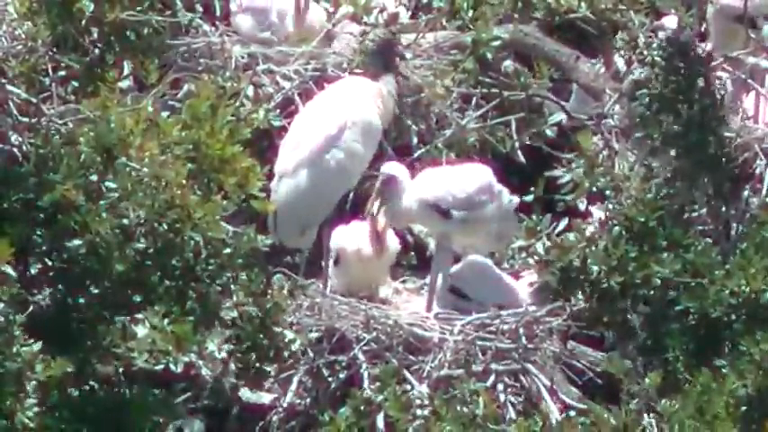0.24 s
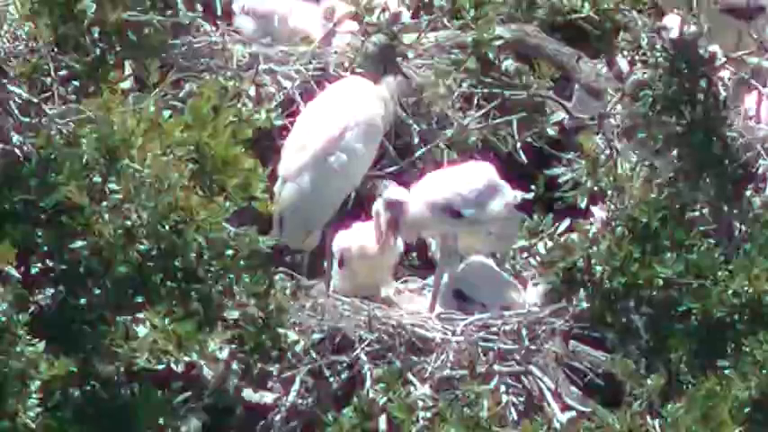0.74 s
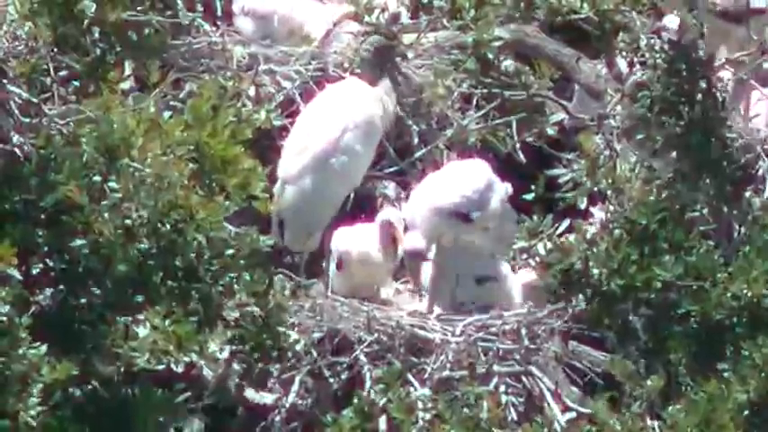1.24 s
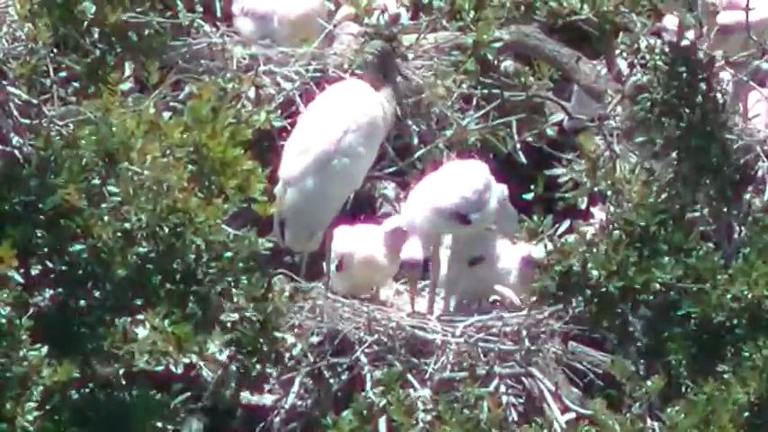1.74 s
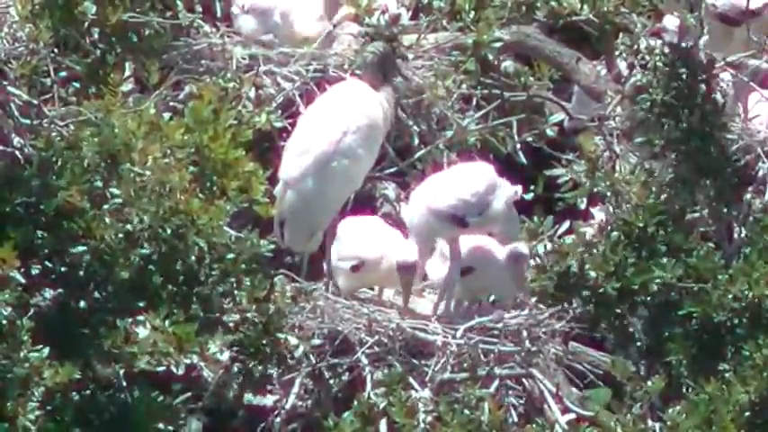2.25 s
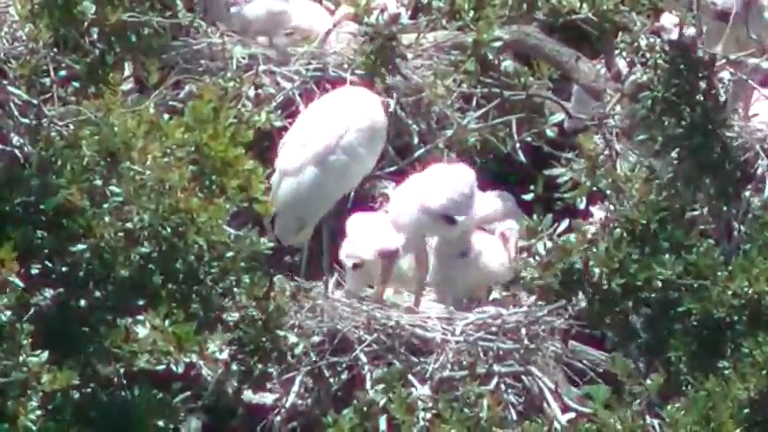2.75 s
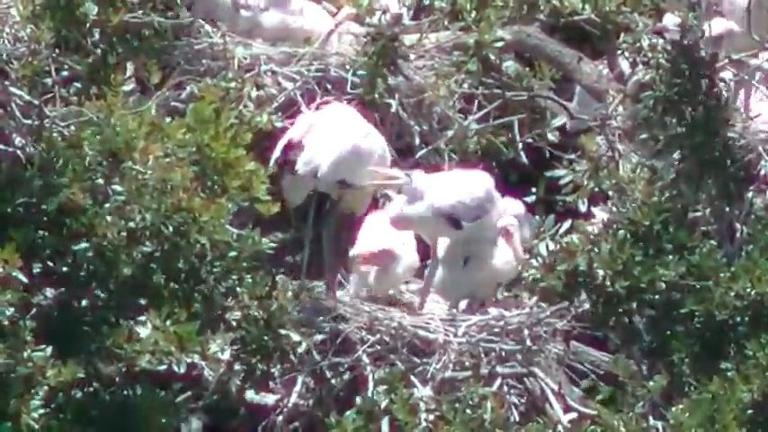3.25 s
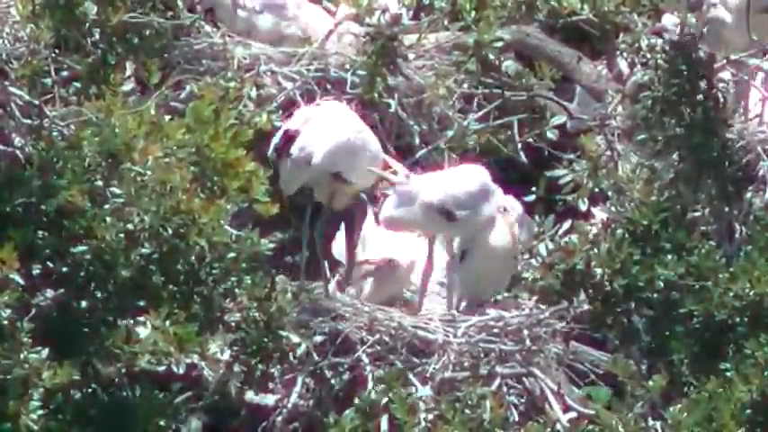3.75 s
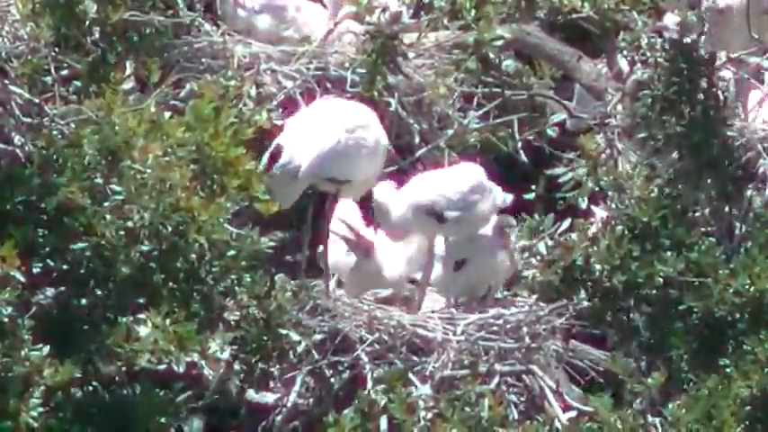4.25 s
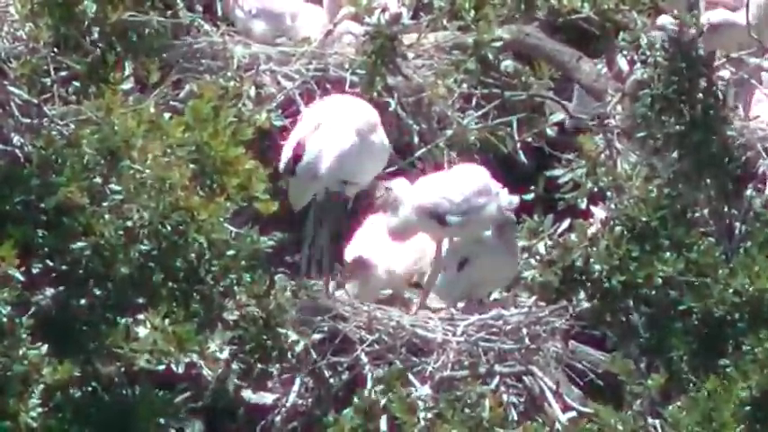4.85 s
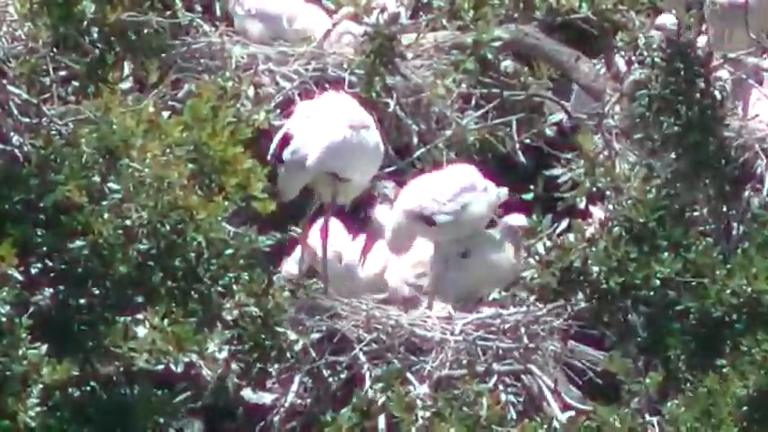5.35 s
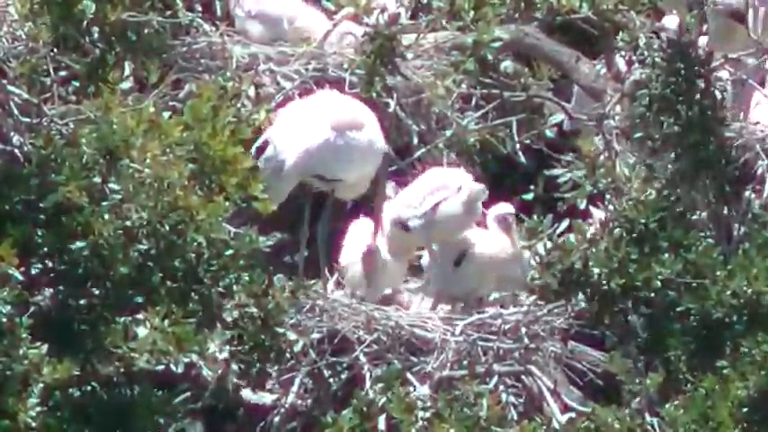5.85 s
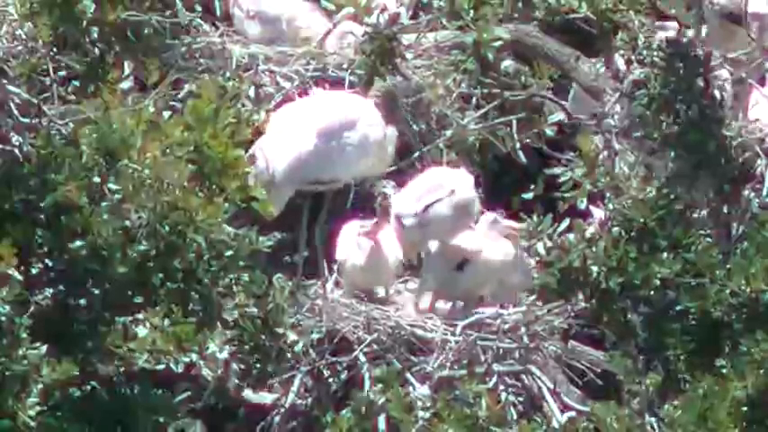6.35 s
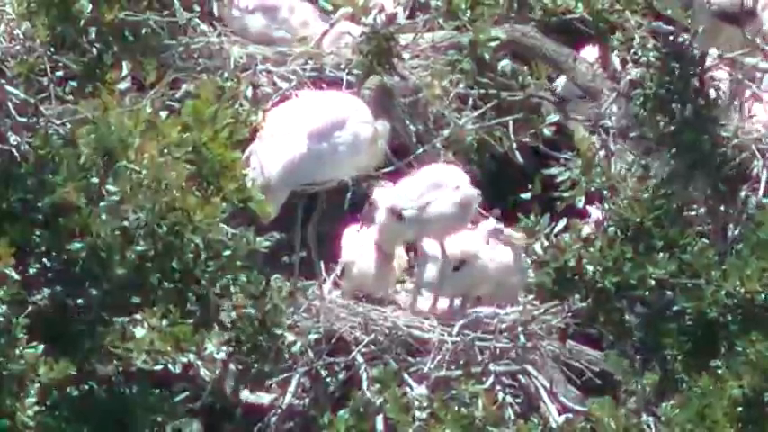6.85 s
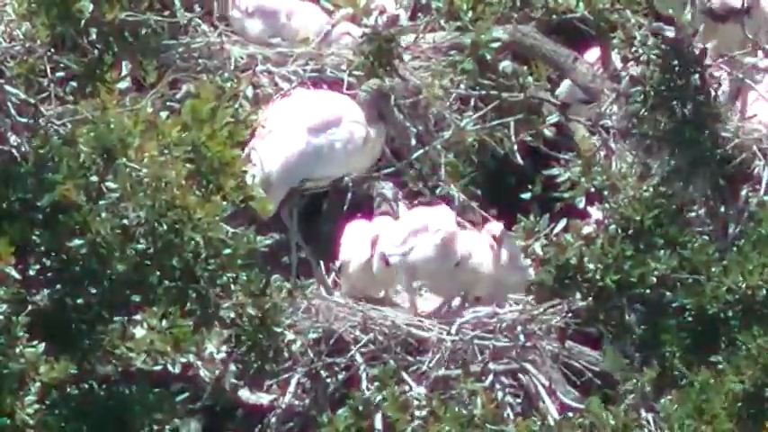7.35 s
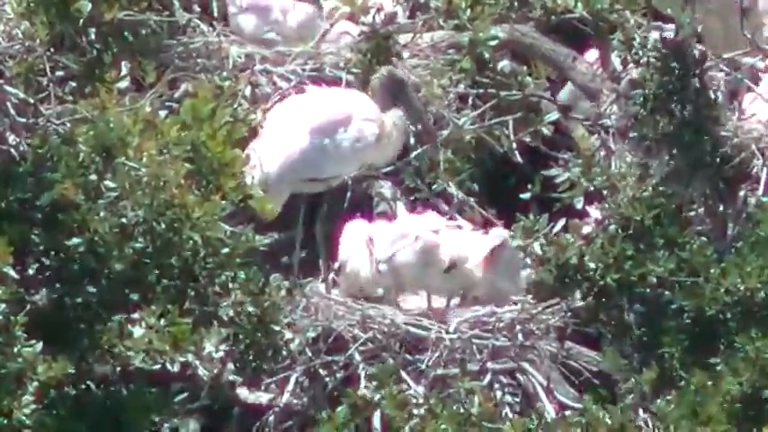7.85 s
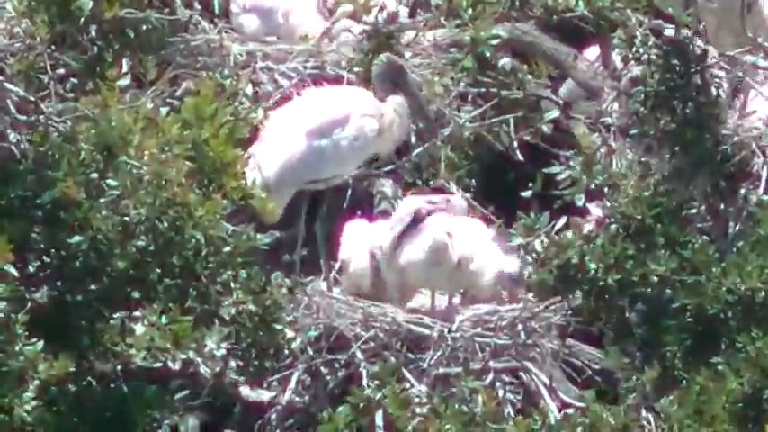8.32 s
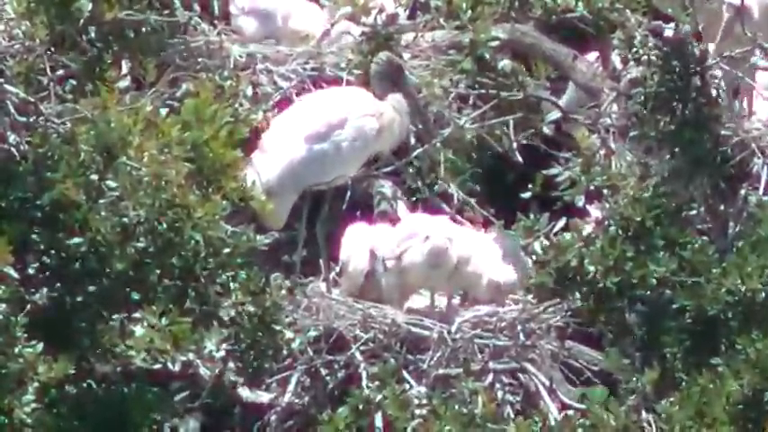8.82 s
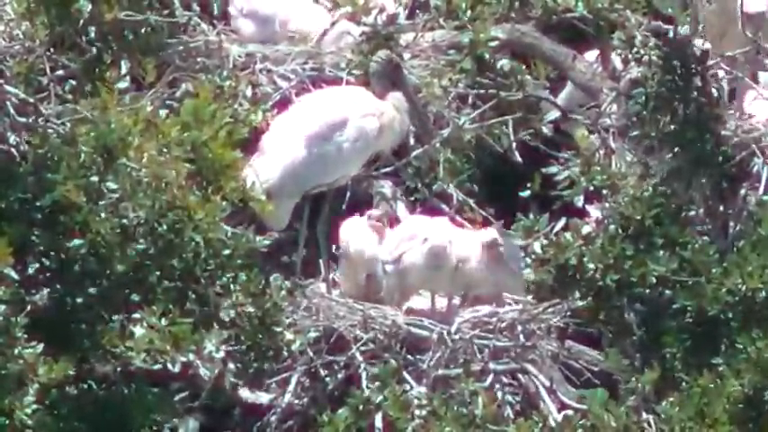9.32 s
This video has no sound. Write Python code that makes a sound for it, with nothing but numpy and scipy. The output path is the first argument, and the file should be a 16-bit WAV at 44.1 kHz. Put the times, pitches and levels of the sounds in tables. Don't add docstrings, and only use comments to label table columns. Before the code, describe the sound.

Outdoors at a wading-bird nesting colony, dry twigs scrape, rustle and snap very close to the microphone, with dull handling thumps and faint far bird chatter. After a brief dead silence the scene changes: a high cicada buzz drones steadily while a small songbird repeats a rising whistle and trill, and chicks squawk far off.

```python
import sys
import numpy as np
from scipy import signal
from scipy.fft import rfft, irfft, next_fast_len
from scipy.io import wavfile
from scipy.ndimage import uniform_filter1d

SR = 44100
rng = np.random.default_rng(int(sys.argv[2]) if len(sys.argv) > 2 else 0)


def generate_wav(sig):
    pcm = np.round(np.clip(np.atleast_2d(sig).T, -1, 1) * 32767).astype(np.int16)
    wavfile.write(sys.argv[1], SR, pcm)


def gain_from_db(level_db):
    decades = np.asarray(level_db, float) / 20
    return 10 ** decades


N = 422468

# start_s, end_s
CUT_S = (3.342, 3.3955)
# trill_start_s, whistle_lead_s, whistle_level_db, trill_length_s
SONG_PHRASES = [(3.421, 0.067, -49, 0.082), (3.662, 0.063, -50, .085), (3.909, 0.063, -51, 0.082),
                (4.147, .057, -50.5, 0.088), (4.404, .062, -53, .1), (4.66, .057, -56, 0.1),
                (4.935, .05, -59, 0.089), (5.21, 0.061, -54, 0.097), (5.485, 0.064, -51.5, 0.081)]


def evened(x):
    return x / np.sqrt(np.mean(abs(x) ** 2) + 1e-20)


def read(points, hz):
    f, value = np.transpose(points)
    return np.interp(np.log(hz + 1), np.log(f + 1), value)


def column(rows, index):
    rows = np.array(rows)
    return np.interp(np.arange(N) / SR, rows[:, 0], rows[:, index])


def add(mix, start_s, sound, left_right_db):
    part = mix[:, round(start_s * SR):][:, :sound.shape[-1]]
    gain = gain_from_db(np.array([[.5], [-.5]]) * left_right_db)
    part += sound[..., :part.shape[1]] * gain


def resonate(x, hz, width_hz):
    turn = np.exp(2j * np.pi * hz * np.arange(x.shape[-1]) / SR)
    r = np.exp(-np.pi * width_hz / SR)
    smooth = signal.lfilter([(1 - r) ** 2], [1, -2 * r, r * r], x / turn)
    return 2 * (turn * smooth).real


def highpass(x, order, hz):
    return signal.sosfilt(signal.butter(order, hz, "high", fs=SR, output="sos"), x)


def hiss(colour, patchy_db, flicker_db, likeness, size=512, count=N):
    # frequency_hz, coherence (0 to 1)
    coherence = [(100, 0.064), (600, 0.15), (900, 1), (2000, 0.42), (4500, 0.63), (7000, 0.051),
                 (10500, 0.057), (11400, 1)]
    frames, hz = 4 * count // size + 8, np.fft.rfftfreq(size, 1 / SR)
    a, b, c, d, patch = rng.standard_normal((frames, len(hz), 5), dtype=np.float32).T
    patch = uniform_filter1d(patch, size=6, axis=0)
    patch = evened(uniform_filter1d(patch, size=14, axis=1))
    flicker = evened(uniform_filter1d(rng.standard_normal(frames), size=3))
    like = np.clip(likeness * read(coherence, hz), 0, 1)[:, None]
    left = a + 1j * b
    right = like * left + np.sqrt(1 - like ** 2) * (c + 1j * d)
    z = np.array([left, right])
    z *= gain_from_db(read(colour, hz)[:, None] + patchy_db * patch + flicker_db * flicker)
    return evened(signal.istft(z, nperseg=size, noverlap=size * 3 // 4)[1][:, :count])


def background():
    # time_s, level_db
    din_level = [
        [(0.0, -57.5), (1.14, -62.5), (1.45, -62.5), (1.75, -54), (2.13, -61.5), (2.55, -63.5), (3.34, -63)],
        [(3.4, -52.5), (3.95, -55), (4.91, -57), (5.39, -53), (5.6, -55.5), (6.5, -55), (7.32, -52.5),
         (7.89, -54), (8.62, -56.5), (9.08, -54), (9.58, -55)],
    ]
    # frequency_hz, density_db
    din_colour = [(150, -55), (400, -32), (1300, -26), (1800, -5), (4000, -6.5), (5500, -9), (7500, -26.5),
                  (16000, -22)]
    # frequency_hz, density_db
    air_colour = [(60, -14.5), (150, -13.5), (300, -6.5), (1200, -10.5), (4000, -9), (12000, -8),
                  (14000, -3), (16000, -21.5)]
    # level_db, level_db
    air_db = (-66, -64.5)
    first = np.arange(N) < CUT_S[1] * SR
    din = gain_from_db(column(din_level[0] + din_level[1], index=1) - 1.0) * hiss(din_colour, 2.44, 1.0, 1)
    air = hiss(air_colour, 0.65, 0.27, 0.99, size=1024)
    top = signal.sosfiltfilt(signal.butter(4, 11000, "high", fs=SR, output="sos"), air)
    return din + gain_from_db(np.where(first, *air_db)) * (air - 0.5 * first * top)


def squawks():
    # start_s, length_s, throat_hz, width_hz, level_db
    squawk_rows = [(2.622, 0.025, 3240, 650, -63), (4.27, 0.028, 2900, 860, -51),
                   (4.635, 0.04, 2900, 1300, -52), (4.98, 0.056, 1850, 450, -59),
                   (5.335, 0.057, 2070, 450, -55.5), (5.725, 0.092, 3360, 1500, -54.5),
                   (5.86, 0.08, 3300, 700, -57), (6.185, 0.06, 3200, 800, -58),
                   (5.965, .05, 3200, 800, -58), (2.7, .07, 4300, 700, -59), (6.083, 0.04, 3150, 400, -56),
                   (6.123, 0.081, 2340, 900, -59), (6.928, 0.094, 3380, 340, -54),
                   (8.213, 0.059, 2200, 800, -62.5), (8.05, 0.14, 4550, 1400, -53),
                   (4.5, 0.056, 5100, 1400, -57), (9.12, 0.04, 2000, 890, -60),
                   (9.485, 0.1, 2130, 580, -53.5), (2.31, 0.11, 4500, 400, -56),
                   (8.74, .04, 2100, 700, -62), (0.69, .04, 2900, 500, -58), (2.175, 0.034, 1950, 630, -53)]
    out = np.zeros((2, N))
    for start_s, length_s, throat_hz, width_hz, level_db in squawk_rows:
        t = np.arange(round(length_s * SR)) / SR
        pulses = .5 + np.exp(-(t * 110 % 1) / 0.36)
        rasp = resonate(pulses * rng.standard_normal(len(t)), throat_hz, width_hz)
        rasp = evened(highpass(rasp, 6, 1600))
        add(out, start_s, gain_from_db(level_db) * rasp * signal.windows.tukey(len(t), .4), rng.normal(0, 1))
    return out


def tone(hz, level_db, rough):
    flutter = 1 + rough * evened(uniform_filter1d(rng.standard_normal(len(hz)), size=90))
    phase = 2 * np.pi * np.cumsum(hz) / SR
    note = gain_from_db(level_db) * flutter * np.sin(phase) * signal.windows.tukey(len(hz), .3)
    bushes = rng.standard_normal((2, 3000)) * gain_from_db(-60 * np.arange(3000) / SR / .11)
    bushes[:, :60] = 0
    echo = signal.fftconvolve(note[None], bushes / np.linalg.norm(bushes[0]), axes=1)
    return np.pad(note, (0, 2999)) + gain_from_db(-11.0) * echo


def whistle_notes():
    # start_s, length_s, pitch_hz, level_db
    peeps = [(0.756, 0.064, 2293, -59.5), (0.762, 0.051, 4020, -64), (1.119, .038, 2080, -69),
             (1.263, 0.032, 2100, -67), (2.0, 0.06, 810, -67.5), (2.332, 0.022, 2940, -54.5),
             (2.4, 0.1, 1830, -62.5), (2.43, 0.088, 3878, -60), (2.53, .025, 4990, -63),
             (2.73, .02, 4240, -63), (2.765, 0.042, 1844, -69), (3.11, 0.07, 1856, -69),
             (3.205, .035, 1870, -70), (3.254, .085, 1880, -68.5), (3.21, .12, 3130, -75),
             (5.395, 0.028, 3220, -52.5), (6.66, .03, 3700, -58), (6.84, .02, 3700, -56),
             (7.401, 0.052, 3740, -55), (7.215, .04, 3400, -59), (7.235, .022, 4230, -54),
             (7.28, .02, 2630, -56), (7.31, .06, 3430, -59), (7.268, .04, 3720, -60),
             (7.16, .02, 2360, -58), (7.533, .03, 2420, -58), (7.535, .022, 2080, -57),
             (4.7, .03, 3950, -59.5), (4.62, .03, 2100, -56), (5.33, .05, 1850, -58),
             (5.88, .025, 3420, -54), (2.38, .025, 3700, -59), (2.57, .045, 1850, -70),
             (2.628, .03, 3450, -64), (1.365, .022, 4500, -64), (1.398, .016, 3980, -65),
             (1.41, .025, 4760, -66), (1.38, .04, 2060, -65), (7.45, 0.029, 3210, -59),
             (7.64, .03, 3130, -60), (7.685, .025, 3170, -59), (7.72, .02, 3170, -61),
             (8.02, 0.038, 4280, -62), (8.184, .036, 3700, -59), (8.297, 0.056, 3450, -60.5)]
    # start_s, length_s, start_hz, end_hz, level_db
    glides = [(0.055, .062, 3780, 2990, -54.5), (1.118, .072, 3820, 3180, -58),
              (1.37, .052, 3850, 3120, -59), (1.142, .058, 4900, 4700, -63), (1.152, .04, 4100, 3800, -62),
              (6.532, .015, 3280, 2950, -52), (2.226, .021, 2940, 3310, -62.5),
              (2.252, .05, 4050, 3650, -60), (2.499, 0.044, 4090, 3750, -57.5),
              (2.693, .025, 2820, 3290, -61), (2.705, 0.13, 4710, 2640, -60),
              (2.797, .05, 3160, 2630, -56.5), (6.489, 0.05, 2980, 3250, -46),
              (6.806, 0.0276, 2254, 2760, -57), (6.896, 0.031, 4120, 3560, -46.5),
              (6.918, .04, 3580, 3270, -46)]
    # start_s, length_s, ends_hz, middle_hz, level_db
    arches = [
        (6.032, .056, 2900, 3260, -48),
        (6.69, .09, 1590, 1930, -53.5),
        (7.169, .045, 1810, 1962, -55),
        (6.69, .085, 3780, 3480, -57),
    ]
    # start_s, length_s, lowest_hz, level_db
    hooks = [
        (5.862, .075, 1900, -56.5),
        (6.308, .085, 1920, -54.5),
    ]
    song_whistle = (.05, 3140, 3460, 3530)
    sag = 0.0584
    hook_from, hook_to = 1.3, 1.17
    notes = [(s - lead_s, *song_whistle, db) for s, lead_s, db, _ in SONG_PHRASES]
    notes += [(s, length, hz, hz, hz, db) for s, length, hz, db in peeps]
    for s, length, a_hz, b_hz, db in glides:
        notes.append((s, length, a_hz, (a_hz + b_hz) / 2 + sag * (b_hz - a_hz), b_hz, db))
    notes += [(s, length, ends_hz, hz, ends_hz, db) for s, length, ends_hz, hz, db in arches]
    notes += [(s, length, hook_from * hz, hz, hook_to * hz, db) for s, length, hz, db in hooks]
    return notes


def whistles():
    out = np.zeros((2, N))
    for start_s, length_s, start_hz, middle_hz, end_hz, level_db in whistle_notes():
        u = np.linspace(-1, 1, round(length_s * SR))
        bend_hz = (start_hz + end_hz) / 2 - middle_hz
        hz = middle_hz + (end_hz - start_hz) / 2 * u + bend_hz * u ** 2
        rough = .3 if start_s < CUT_S[0] else .16
        add(out, start_s, tone(hz, level_db, rough), rng.normal(0, 1))
    return out


def trills():
    # top_hz, centre_hz, swing_hz, wobbles_per_s
    trill_pitch = (2950, 2560, 235, 64.3)
    top_hz, centre_hz, swing_hz, wobbles = trill_pitch
    level_db, lead_db, pulse_db = -51.5, -5, 2.2
    out = np.zeros((2, N))
    for start_s, _, _, length_s in SONG_PHRASES:
        t = np.arange(round(length_s * SR)) / SR
        drop = 1 / (1 + np.exp((t - .024) / 0.0036))
        wobble = swing_hz * np.cos(2 * np.pi * wobbles * (t - .037))
        db = level_db + lead_db * drop - pulse_db * (1 - drop) * wobble / swing_hz
        hz = drop * (top_hz - 9000 * (t - .012)) + (1 - drop) * (centre_hz + wobble)
        add(out, start_s, tone(hz, db, 0.2), 1.5)
    return out


def birds():
    return highpass(squawks() + whistles() + trills(), 2, 600)


def cicada():
    # time_s, rate_hz
    click_rate = [(3.39, 132.7), (5.5, 137.7), (6.95, 140.1), (7.05, 139.0), (8.0, 139.35), (8.1, 137.9),
                  (8.4, 138.5), (9.58, 138.7)]
    # time_s, level_db
    drone_level = [(3.4, -48.5), (3.6, -51.5), (4.1, -50), (4.6, -48.5), (5.0, -47.5), (5.68, -48.5),
                   (6.15, -45.5), (6.25, -49.5), (6.87, -48), (7.38, -47.5), (8.0, -48.5), (8.2, -49.5),
                   (8.96, -50), (9.58, -49)]
    # time_s, lean_to_odd_overtones_db
    odd_lean = [(3.39, -3), (3.95, -2), (4.05, 5), (4.6, 8), (5.4, 8), (6.15, 8), (6.22, -2), (6.6, -3.5),
                (6.95, -3), (7.05, -1.5), (8.0, -2), (8.15, 9), (9.58, 9)]
    # frequency_hz, width_hz, level_db
    tymbal_modes = [(4590, 440, 2), (5130, 520, -.5), (5750, 800, -13), (9760, 1080, -19)]
    tilt_db = (.6, -1.3)
    start = round(CUT_S[1] * SR)
    rate, level_db, odd_db = (column(rows, index=1)[start:] for rows in (click_rate, drone_level, odd_lean))
    wander_hz = .05 * evened(uniform_filter1d(rng.standard_normal(len(rate)), size=3000))
    turns = np.cumsum(rate + wander_hz) / SR
    click_db = 1.6 * evened(np.diff(rng.standard_normal(1000)))
    strength = gain_from_db(np.interp(turns, np.arange(len(click_db)), click_db))
    spin = np.exp(2j * np.pi * turns)

    at, knots = np.arange(len(spin)), np.arange(0, len(spin) + 1300, 1300)
    real, imag = uniform_filter1d(rng.standard_normal((2, 2, 90, len(knots))), size=2, axis=3)
    shared, apart = real + 1j * imag
    lean, stack, overtone = gain_from_db(odd_db / 2), np.zeros((2, len(spin))), spin ** 28
    tilt = np.linspace(*tilt_db, len(spin))
    for k in range(29, 79):
        overtone = overtone * spin
        if 46 < k < 66:
            continue
        low = k < 50
        wave = overtone * (lean if k % 2 == low else 1 / lean)
        if low:
            wave = wave * gain_from_db(tilt * (np.clip(k, 32, 39) - 35))
        stack += (wave * np.interp(at, knots, 1 + (.6 if low else 1.8) * shared[k])).real
        stack[1] += (wave * np.interp(at, knots, (.5 if low else 1.5) * apart[k])).real

    gate = 2.8 + np.exp(1.8 * spin.real)
    puffs = evened(gate * (rng.standard_normal(len(spin)) + 1.1 * rng.standard_normal(stack.shape)))
    rough = np.clip(.3 - .022 * abs(odd_db), .05, 1)
    clear = np.sqrt(1 - rough) * evened(strength * stack)
    noisy = 1.2 * np.sqrt(rough) * puffs
    body = np.zeros(stack.shape)
    for index, (hz, width_hz, db) in enumerate(tymbal_modes):
        high = hz > 8000
        gain = (-1) ** index * gain_from_db(db + high * np.array([[0], [3.0]]))
        body += gain * resonate(clear + (1 + 2.2 * high) * noisy, hz, width_hz)
    return np.pad(gain_from_db(level_db - 2.5) * evened(body), ((0, 0), (start, 0)))


def strokes(rows, count):
    gain = np.zeros((2, count))
    for start_s, length_s, level_db in rows:
        add(gain, start_s, gain_from_db(level_db) * signal.windows.tukey(round(length_s * SR), .45), 0)
    return gain


def rustle():
    # frequency_hz, density_db
    scrape_colour = [(1100, -20), (2100, 1.5), (4500, -2.5), (6900, -2), (8100, -10), (9500, -5),
                     (11500, -12), (14800, -12)]
    # frequency_hz, density_db
    thump_colour = [(60, -46), (105, -34), (155, -10), (280, 4.5), (550, -1), (1200, -11), (2500, -39)]
    # start_s, length_s, level_db, brightness_db
    scrape_rows = [(0, 0.033, -63, 0), (0.053, 0.083, -55.5, -14), (0.14, 0.13, -51, -2),
                   (0.316, 0.024, -55, 2), (0.368, 0.21, -73, 10.5), (0.635, 0.12, -50.5, -2.5),
                   (0.791, 0.14, -57, 0), (0.92, 0.02, -61.5, 6.5), (1.127, 0.087, -61, -8),
                   (1.351, 0.073, -56, -27), (1.526, 0.069, -49, -11), (1.61, 0.037, -51.5, -14),
                   (1.687, 0.022, -58, 0), (1.731, 0.039, -52, -6), (1.78, 0.16, -54.5, -8),
                   (1.918, 0.046, -45, -16), (1.951, 0.064, -43.5, -4), (2.047, 0.086, -54.5, -5.5),
                   (2.172, 0.032, -52, -2), (2.298, 0.13, -48.5, -1.5), (2.445, 0.028, -56.5, -23),
                   (2.511, .045, -57, -21), (2.901, 0.045, -52, -1), (3.054, 0.022, -57, -18)]
    # start_s, length_s, level_db
    thump_rows = [(.15, 0.27, -78.5), (1.512, .015, -70), (1.535, .03, -68), (1.58, .03, -70),
                  (1.62, .03, -71), (1.655, .022, -68), (1.72, 0.075, -75), (1.798, 0.016, -66),
                  (1.83, .02, -74), (1.87, 0.035, -70.5), (1.905, 0.045, -60), (1.953, .04, -66),
                  (2.075, 0.049, -56.5), (2.29, 0.021, -68), (2.41, 0.018, -64), (2.445, 0.039, -65.5),
                  (2.515, 0.0144, -58.5), (2.555, 0.0155, -70), (2.71, 0.029, -75), (2.83, 0.017, -72),
                  (2.885, 0.029, -66), (2.916, 0.029, -56.5), (2.97, 0.022, -64.5), (3.06, 0.055, -69.5),
                  (3.238, 0.014, -62)]
    count = round(CUT_S[1] * SR)
    scrape = hiss(scrape_colour, 2.5, 2.2, .85, size=128, count=count)
    dull = signal.sosfiltfilt(signal.butter(2, 6000, fs=SR, output="sos"), scrape)
    body = strokes([row[:3] for row in scrape_rows], count)
    edge = strokes([(s, length, db + bright_db) for s, length, db, bright_db in scrape_rows], count)
    thumps = strokes(thump_rows, count) * hiss(thump_colour, 2.0, 2.5, 2.5, size=256, count=count)
    return np.pad(body * dull + edge * (scrape - dull) + thumps, ((0, 0), (0, N - count)))


def snaps():
    # start_s, peak_db, ring_hz, left_right_db
    twigs = [(0.3212, -33, 2940, -9), (0.6748, -44, 2980, -3), (0.7453, -31, 3100, 3),
             (0.8656, -35.5, 2920, 3), (1.678, -34, 3500, 0), (1.9462, -33, 3730, 0),
             (2.4496, -43, 3100, 0), (1.8008, -39, 1920, -2), (1.9114, -20, 3070, 3),
             (2.2984, -34.5, 2050, 3), (2.8322, -36, 3840, 3), (2.9292, -34, 3850, 3), (3.16, -48, 1860, 3),
             (6.6326, -20.5, 4870, 3)]
    # start_s, peak_db, ring_hz, left_right_db
    cracks = [(0.0814, -36.5, 3450, 3), (0.2417, -37, 6560, 3), (0.2534, -48, 4220, -1),
              (0.2938, -23.5, 3680, 3), (0.3857, -40, 5360, -2), (0.4519, -38, 5030, 3),
              (0.8962, -36, 6800, 3), (2.9738, -41.5, 2180, 3), (1.6995, -34, 3720, -1),
              (2.021, -40, 4400, -2), (2.0305, -31, 3700, 1), (0.155, -43, 4700, 0), (0.4, -44, 5300, 0),
              (0.57, -50, 7300, 0), (0.8145, -44, 6500, 0), (0.885, -46, 6400, 0), (0.93, -45, 6800, 0),
              (0.9792, -50, 5900, 0), (1.689, -40, 4400, 0)]
    # start_s, peak_db, ring_hz, left_right_db
    taps = [(0.0887, -30.5, 1980, 3), (1.511, -37, 1690, 3), (1.532, -38.5, 1600, -1),
            (1.6601, -24, 3820, 3), (1.6664, -13.5, 4940, -1), (1.8646, -41, 3220, 0),
            (1.9963, -9.5, 4270, -1.5), (2.006, -39, 3650, -.5), (2.4205, -43, 1830, .5),
            (2.5117, -45, 3940, 3), (2.918, -36, 3920, -5), (3.0396, -46, 3980, 3),
            (3.0655, -35.5, 2680, 1), (3.1008, -44, 2860, 2), (3.2431, -47, 1890, -1)]
    # frequency_hz, width_hz, level_db
    fizz_bands = [(7000, 700, 1), (9500, 1300, 3), (13500, 2800, -1)]
    kinds = ((twigs, (-45, -35)), (cracks, (-35, -13)), (taps, (-11.5, -19)))
    overtone, overtone_db = 1.71, -12
    out, t = np.zeros((2, N)), np.arange(900) / SR
    rows = [(*row, *levels) for kind, levels in kinds for row in kind]
    chance = rng.standard_normal((len(rows), 2, 2, len(t)))
    onset = 1 - np.exp(-t * SR / 4)
    for (start_s, peak_db, hz, pan_db, low_db, top_db), (grit, fizz) in zip(rows, chance):
        ring = np.sin(2 * np.pi * hz * t) + gain_from_db(overtone_db) * np.sin(2 * np.pi * overtone * hz * t)
        ring = ring * gain_from_db(-60 * t / .0036)
        splinters = 0.28 * evened(resonate(grit, 3760, 3900)) * gain_from_db(-60 * t / 0.024)
        knock = gain_from_db(low_db - 4.5) * np.sin(2 * np.pi * min(hz, 1650) * t) * gain_from_db(-60 * t / 0.019)
        bands = sum(gain_from_db(db) * resonate(fizz, f_hz, width_hz) for f_hz, width_hz, db in fizz_bands)
        top = gain_from_db(top_db + 5.0) * evened(bands) * gain_from_db(-60 * t / .009)
        snap = gain_from_db(peak_db) * onset * (ring + splinters + knock + top)
        add(out, start_s + .0006, snap, np.clip(pan_db, -3, 3))
    return highpass(out, 2, 700)


def scene():
    return background() + birds() + cicada() + rustle() + snaps()


def roll_off(x):
    return signal.sosfilt(signal.butter(12, 16520, fs=SR, output="sos"), x)


def record(dry):
    lead_samples, early_db, low_hz, high_hz = 166.4, 2.5, 205, 7400
    size = 2 * next_fast_len(N // 2 + 256)
    hz, tracks = np.fft.rfftfreq(size, 1 / SR), rfft(dry, size)
    band = 1 / (1 + (low_hz / (hz + 1)) ** 4) / (1 + (hz / high_hz) ** 14)
    early = gain_from_db(early_db) * band * tracks.mean(0)
    late = tracks * np.exp(-2j * np.pi * hz * lead_samples / SR)
    top = np.where(hz < 15850, 1, gain_from_db(-22.0))
    t = np.arange(N) / SR
    audible = (t < CUT_S[0]) | (t > CUT_S[1])
    mixed = irfft((early + late) * top)[:, :N] * gain_from_db(-1.5) * audible
    return roll_off(mixed)


dry = scene()
out = record(dry)
generate_wav(out)
```